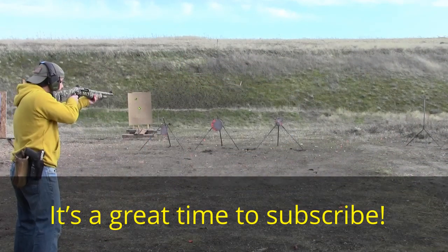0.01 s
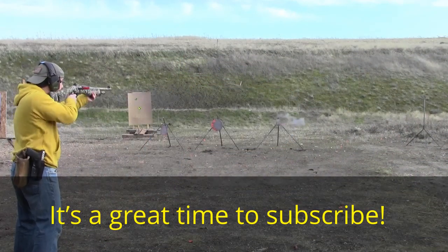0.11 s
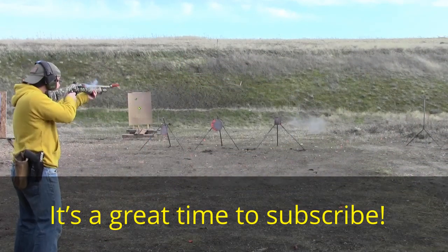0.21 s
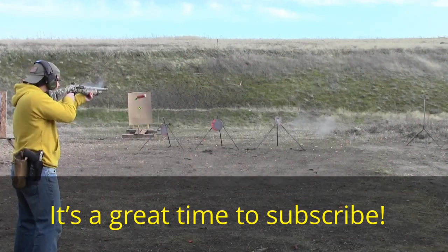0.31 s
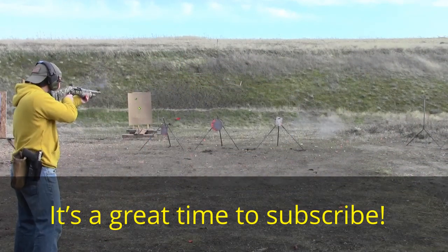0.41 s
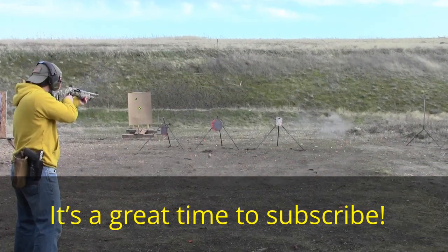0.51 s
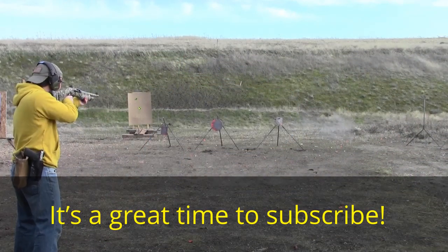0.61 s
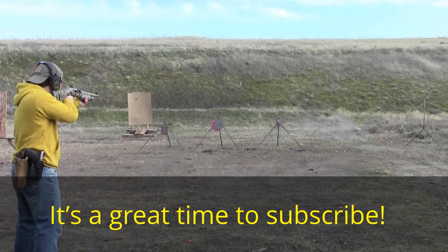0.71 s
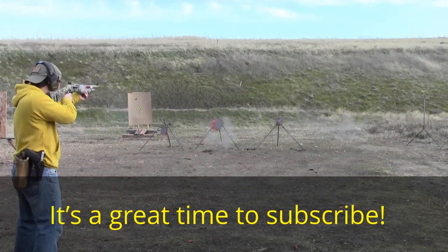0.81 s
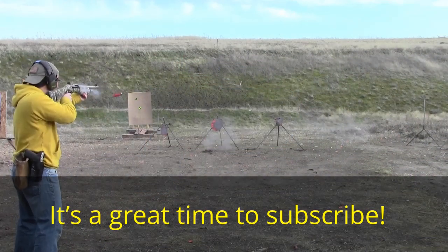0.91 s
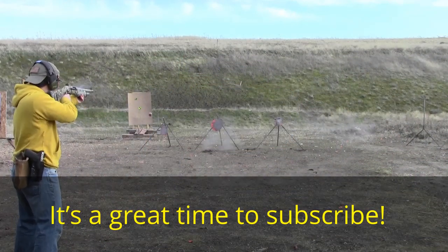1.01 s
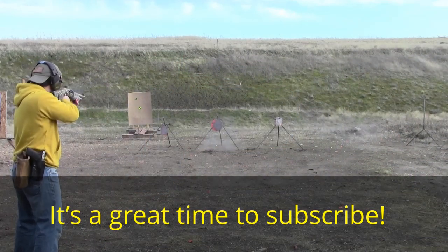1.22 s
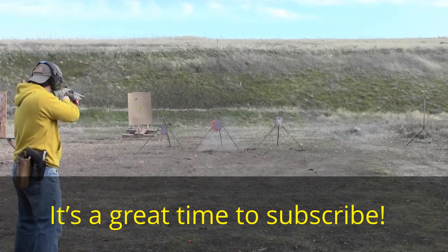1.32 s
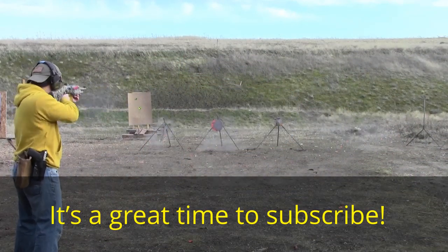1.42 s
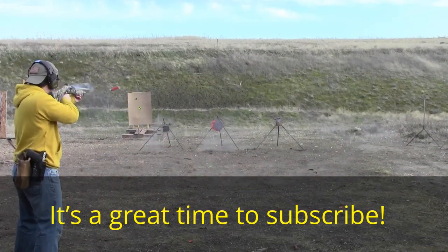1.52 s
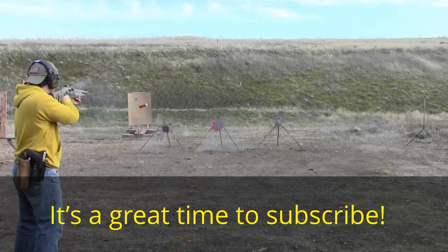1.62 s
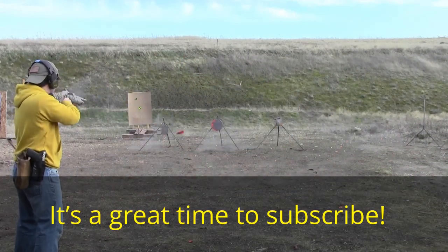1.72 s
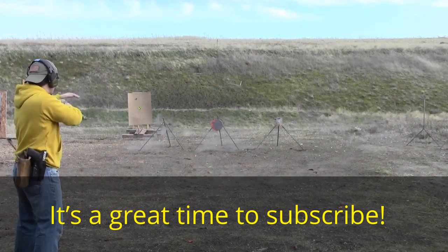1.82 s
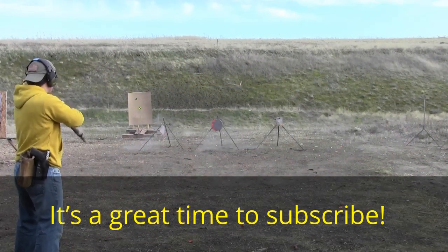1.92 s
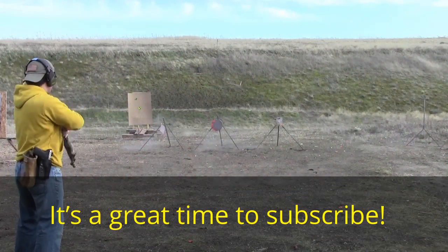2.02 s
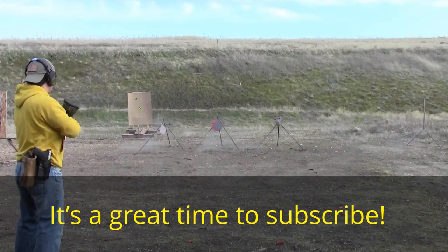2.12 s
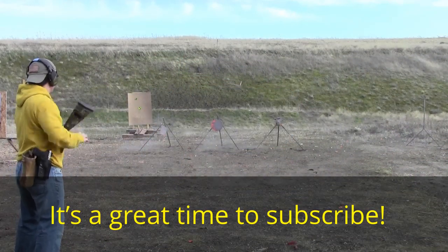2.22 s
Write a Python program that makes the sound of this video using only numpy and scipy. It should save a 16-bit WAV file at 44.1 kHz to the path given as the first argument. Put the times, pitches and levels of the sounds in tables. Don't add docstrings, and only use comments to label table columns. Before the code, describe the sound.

Three loud gunshots outdoors, each cracking on a steel plate that rings, echoes rolling back, small clicks after

```python
import sys
import numpy as np
from scipy import signal
from scipy.fft import rfft, irfft, next_fast_len
from scipy.io import wavfile
from scipy.ndimage import map_coordinates

SR = 44100
rng = np.random.default_rng(int(sys.argv[2]) if len(sys.argv) > 2 else 0)


def file_out(sig):
    cols = np.atleast_2d(sig).T
    lim = np.clip(cols, -1, 1)
    pcm = np.round(lim * 32767).astype(np.int16)
    wavfile.write(sys.argv[1], SR, pcm)


def boost(x):
    u = np.asarray(x, float) / 20
    return 10 ** u


N = 99225
TIME = np.arange(N) / SR

# (frequency [Hz], density [dB per Hz])
AIR_SPECTRUM = [(20, -22.5), (40, 7), (300, -8.5), (1500, -11.5), (5000, -16.5), (11000, -19.5),
                (15700, -37)]
AIR_DB = -58.5
TAP_MODES_HZ = [1453, 2003, 3036, 3692, 3909, 6013]
TAP_MODES_DB = [-72, -85, -78.5, -73.5, -70.5, -84]
TAP_S, TAP_DB, TAP_T60 = .0687, -43.5, 0.73
# (time [s], peak level [dB], frequency [Hz])
CLICKS = [(1.147, -12, 7100), (1.375, -26.5, 7200), (1.782, -21.5, 8000), (1.91, -22.5, 8500),
          (1.96, -52, 12500), (1.986, -34, 9000), (2.05, -30.5, 7750), (2.073, -39.5, 11300),
          (2.09, -29, 8500), (2.096, -36.5, 7600), (2.134, -32.5, 8000), (2.141, -29, 8000),
          (2.182, -38.5, 7000), (2.21, -46, 9000)]
CLICK_LONG_S, KNOCK_S, KNOCK_DB = 0.00124, 2.1335, -24

# (time [s], level [dB])
SHOTS = [
    (0.2181, -0.5),
    (0.8628, -0.5),
    (1.4918, -0.5),
]
# (frequency [Hz], density [dB per Hz])
BLAST_SPECTRUM = [(120, -35), (200, -8.5), (2000, -1), (4980, -9), (6910, -4.5), (12600, -13.5),
                  (15700, -20)]
BLAST_DB, BLAST_HOLD_S, BLAST_T60 = 15.5, .004, 0.0257
PUSH_DB, PUSH_HZ = 20.5, 591
LEAD_S, LEAD_RISE_S, LEAD_DB, CREEP_S, CREEP_DB = .0036, .0008, -12, 0.00483, -21.5
# (frequency [Hz], density [dB per Hz])
GROUND_SPECTRUM = [(24, -52), (40, 1.5), (709, -4.5), (956, -4), (1430, -6), (3020, -7.5), (3780, -12),
                   (8420, -16.5), (15700, -34.5)]
# (frequency [Hz], 60 dB decay time [s])
GROUND_T60 = [(60, 0.104), (150, 0.521), (400, 0.8462), (1500, 0.5567), (6000, 0.4015), (14000, 0.3506)]
GROUND_DB, LUMP_DB, LUMPS_PER_S = 3.5, 2, 340
FIRST_DB, FIRST_T60 = 1, 0.144
# (time after the blast [s], level [dB], centre frequency [Hz], length [s])
FACES = [(.0252, 13.5, 992, .003), (0.044, 12, 1193, .003), (0.0695, 13.5, 1023, 0.0018),
         (0.072, 10.5, 2620, .003), (0.087, -5, 1500, .002), (.135, -32.5, 9000, .002),
         (.264, -17.5, 4500, 0.011), (0.285, -13.5, 2500, .004), (0.313, -11, 3500, 0.0045),
         (0.363, -4.5, 1428, 0.00327), (0.525, -26.5, 1130, .003)]
# (time after the blast [s], level [dB], centre frequency [Hz], length [s])
GLINTS = [
    (.4405, -18, 3700, .0025),
    (.4505, -16, 3800, .0025),
    (.512, -29, 4200, .003),
    (.531, -26, 3900, .003),
]
# (frequency [Hz], density [dB per Hz])
BANK_SPECTRUM = [(88, -17.5), (150, 0), (726, -2.5), (935, -4.5), (2380, -9), (2890, -7.5), (12200, -34.5),
                 (15700, -77.5)]
BANK_S, BANK_RISE_S, BANK_HOLD_S, BANK_T60, BANK_DB = 0.3154, 0.0078, 0.04926, 0.279, -19.5
FOOT_S, FOOT_T60, FOOT_DB = 0.23, 0.59, -1.5
BOOM_S, BOOM_WIDE_S, BOOM_DB, BOOM_HZ, BOOM_WIDE_HZ = 0.2995, 0.0297, -22, 100, 110
# (frequency [Hz], density [dB per Hz])
SLOPES_SPECTRUM = [(30, -30), (80, -9.5), (250, -5.5), (600, -18.5), (2000, -18), (6000, -33.5),
                   (15000, -58.5)]
SLOPES_S, SLOPES_T60, SLOPES_DB = 0.3968, 1.22, -22
SLOPES_END_S, BEYOND_DB = 0.5547, -5
SAME_HZ = 511.4

STRIKE_S = [.0545, .0548, .056]
STRIKE_DB, STRIKE_LONG_S, STRIKE_HZ, RING_T60 = 14, 0.0024, 9000, 0.945
PLATE_A_HZ = [2835, 2835, 9523, 7558, 1523, 9211, 14314, 1082]
PLATE_B_HZ = [3091, 3091, 11744, 11744, 8220, 8183, 8936, 8936, 13078, 13078, 4920, 1378, 2250, 8220]
PLATE_C_HZ = [1454, 1454, 2917, 2003, 670, 1755, 3693, 4334, 1379, 6013]
# (level [dB], loudest time after the blast [s], lobe width
# [s])
LOBES_A = [(-14, 0.346, 0.088), (-1.5, 0.463, 0.1072), (-19, 0.346, 0.0756), (-22.5, 0.34, 0.18),
           (-4.5, 0.565, 0.15), (-24, .1, 0.046), (-40.5, .15, .1), (-13, 0.175, 0.076)]
LOBES_B = [(-11.5, 0.297, 0.067), (0.5, 0.69, 0.2483), (-7, 0.256, 0.0562), (-4, 0.5455, 0.0518),
           (-16.5, 0.216, 0.078), (-21.5, 0.234, 0.14), (-14.5, 0.288, 0.0634), (-10, 0.64, 0.089),
           (-20.5, 0.265, 0.054), (-28, .54, .07), (-11.5, 0.83, 0.394), (-5.5, 0.793, 0.18),
           (-39, 0.42, 0.039), (-16, 0.587, .06)]
LOBES_C = [(1.5, 0.4393, 0.0894), (4, 0.825, 0.186), (-2.5, 0.3295, 0.0354), (-12, 0.278, .1),
           (-5, 0.733, 0.201), (7, 0.8545, 0.118), (-16.5, 0.208, 0.0253), (-19.5, 0.29, 0.103),
           (-6, 0.87, 0.24), (-27, 0.28, .06)]

# (frequency [Hz], side over mid [dB])
SIDE_DB = [(40, -17), (240, -22), (950, -22), (3770, -23), (15000, -19)]
BAND_EDGES_HZ = [0, 700, 2500, 7000, 30000]
DUCK_DB, DUCK_ATTACK_S, RELEASE_S = 20.5, .0005, 0.2583
LOW_HZ, TOP_HZ, CLIP, KNEE = 64.8, 15900, 1.0, 6


def unit(x):
    return x / np.sqrt(np.mean(x ** 2) + 1e-20)


def along(points, hz):
    f, v = np.transpose(points)
    return np.interp(np.log(hz + 1), np.log(f + 1), v)


def filtered(x, response):
    m = next_fast_len(N + 8192)
    return irfft(rfft(x, m) * response(np.fft.rfftfreq(m, 1 / SR)), m)[..., :N]


def split(hz):
    return np.array([(hz >= a) & (hz < b) for a, b in zip(BAND_EDGES_HZ, BAND_EDGES_HZ[1:])])


def noise(spectrum, lump_db=0, rate=100, same=None):
    white = rng.standard_normal(N)
    if same is not None:
        white = white + filtered(same - white, lambda hz: hz < SAME_HZ)
    knots = rng.standard_normal((4, int(N * rate / SR) + 4))
    lumps = np.array([map_coordinates(row, [TIME * rate]) for row in knots])
    lumpy = (filtered(white, split) * boost(lump_db * lumps)).sum(0)
    return unit(filtered(lumpy, lambda hz: boost(along(spectrum, hz))))


def add_burst(track, s, db, hz, long_s, width=.9, step=0):
    t = np.arange(1024) / SR
    scatter = rng.standard_normal(1024) * (t / long_s) * np.exp(1 - t / long_s * 2) * 2
    pressure = step * (1 - t * hz * 4) * np.exp(-t * hz * 4)
    edges = np.clip([hz / (1 + width), hz * (1 + width)], 50, 20000)
    band = signal.butter(2, edges, "band", fs=SR, output="sos")
    burst = signal.sosfilt(band, scatter + pressure)
    spot = track[round(s * SR):][:1024]
    spot += (boost(db) * burst / np.abs(burst).max())[:len(spot)]


def open_air():
    return boost(AIR_DB) * noise(AIR_SPECTRUM, lump_db=-3.0, rate=17.16)


def small_parts():
    out = np.zeros(N)
    u = np.maximum(TIME - TAP_S, 0)
    add_burst(out, TAP_S, TAP_DB, 6000, .001, width=1.4)
    for hz, db in zip(TAP_MODES_HZ, TAP_MODES_DB):
        out += boost(13 + db - 60 * u / TAP_T60) * np.sin(2 * np.pi * hz * u)
    for s, db, hz in CLICKS:
        add_burst(out, s, db, hz, CLICK_LONG_S, width=0.233)
    add_burst(out, KNOCK_S, KNOCK_DB, 900, .002, width=5.1)
    return out


def muzzle_blast(s):
    u = TIME - s
    early = np.minimum(u + LEAD_S, 0)
    rise = np.exp(early / LEAD_RISE_S) + boost(CREEP_DB) * np.exp(early / CREEP_S)
    out = (u < 0) * boost(LEAD_DB) * rise * noise(BLAST_SPECTRUM)
    fall = boost(BLAST_DB - 60 * np.maximum(u - BLAST_HOLD_S, 0) / BLAST_T60)
    out += (u >= 0) * fall * noise(BLAST_SPECTRUM, lump_db=1.5, rate=500)
    add_burst(out, s, PUSH_DB, PUSH_HZ, .002, width=1.72, step=2.9)
    return out


def ground(u, terrain):
    after = np.maximum(u, 0)
    centres = np.geomspace(60, 14000, 7)

    def overlapping(hz):
        return np.array([np.interp(np.log(hz + 1), np.log(centres), row) for row in np.eye(7)])

    bands = filtered(noise(GROUND_SPECTRUM, LUMP_DB, LUMPS_PER_S, terrain), overlapping)
    dying = (bands * boost(-60 * after / along(GROUND_T60, centres)[:, None])).sum(0)
    return (u >= 0) * boost(GROUND_DB) * dying * (1 + boost(FIRST_DB - 60 * after / FIRST_T60))


def hard_faces(s):
    out = np.zeros(N)
    for delay, db, hz, long_s in FACES:
        add_burst(out, s + delay, db, hz, long_s, width=1, step=5)
    for delay, db, hz, long_s in GLINTS:
        add_burst(out, s + delay, db, hz, long_s, width=.22)
    return out


def earth_bank(u, terrain, boom_terrain):
    swell = np.exp(-np.minimum(u - BANK_S, 0) ** 2 / BANK_RISE_S ** 2 / 2)
    level = swell * boost(BANK_DB - 60 * np.maximum(u - BANK_S - BANK_HOLD_S, 0) / BANK_T60)
    level += (u > FOOT_S) * boost(BANK_DB + FOOT_DB - 60 * np.maximum(u - FOOT_S, 0) / FOOT_T60)
    echo = level * noise(BANK_SPECTRUM, lump_db=2.0, rate=220, same=terrain)
    bass = unit(filtered(boom_terrain, lambda hz: np.exp(-((hz - BOOM_HZ) / BOOM_WIDE_HZ) ** 2)))
    return echo + boost(BOOM_DB) * np.exp(-((u - BOOM_S) / BOOM_WIDE_S) ** 2 / 2) * bass


def far_slopes(u, terrain):
    level = np.clip(u / SLOPES_S, 0, 1) ** 3
    level *= boost(SLOPES_DB - 60 * np.maximum(u - SLOPES_S, 0) / SLOPES_T60)
    level *= boost(BEYOND_DB * np.clip((u - SLOPES_END_S) / 0.0276, 0, 1))
    return level * noise(SLOPES_SPECTRUM, lump_db=0.74, rate=150, same=terrain)


def shot(s, terrain):
    u = TIME - s
    near = muzzle_blast(s) + ground(u, terrain[0]) + hard_faces(s)
    return near + earth_bank(u, terrain[1], terrain[2]) + far_slopes(u, terrain[3])


def plate(s, strike_s, modes, lobes):
    out = np.zeros(N)
    u = np.maximum(TIME - s, 0)
    add_burst(out, s + strike_s - STRIKE_LONG_S, STRIKE_DB, STRIKE_HZ, STRIKE_LONG_S)
    for hz, (db, loudest, wide) in zip(modes, lobes):
        lobe = np.exp(-((u - loudest) / wide) ** 2 / 2)
        out += (u > strike_s) * lobe * boost(db - 60 * u / RING_T60) * np.sin(2 * np.pi * hz * u)
    return out


def stereo(mid):
    smear = rng.standard_normal(1500) * boost(-60 * np.arange(1500) / 1500)

    def turn(hz):
        phase = np.angle(rfft(smear, 2 * len(hz) - 2)) * (hz > 300)
        return boost(along(SIDE_DB, hz)) * np.exp(1j * phase) * 1j

    side = filtered(mid, turn)
    return np.array([mid + side, mid - side])


def scene():
    mid = open_air() + small_parts()
    terrain = rng.standard_normal((4, N))
    plates = zip([PLATE_A_HZ, PLATE_B_HZ, PLATE_C_HZ], [LOBES_A, LOBES_B, LOBES_C])
    for (s, db), strike_s, (modes, lobes) in zip(SHOTS, STRIKE_S, plates):
        same_range = np.roll(terrain, round(s * SR), axis=1)
        mid = mid + boost(db) * shot(s, same_range) + plate(s, strike_s, modes, lobes)
    return stereo(mid)


def gain_duck():
    duck = np.zeros(N)
    for s, _ in SHOTS:
        u = TIME - s
        attack = np.clip(1 + u / DUCK_ATTACK_S, 0, 1)
        duck = np.maximum(duck, attack * np.clip(1 - u / RELEASE_S, 0, 1))
    return boost(-DUCK_DB * duck)


def top_cut(x):
    return signal.sosfilt(signal.butter(12, 15870, fs=SR, output="sos"), x)


def record(dry):
    x = filtered(dry, lambda hz: (1j * hz / (LOW_HZ + 1j * hz)) ** 2) * gain_duck()
    overloaded = x / (1 + np.abs(x / CLIP) ** KNEE) ** (1 / KNEE)
    x = filtered(overloaded, lambda hz: hz < TOP_HZ)
    return top_cut(np.clip(x, -CLIP, CLIP))


dry = scene()
out = record(dry)
file_out(out)
```